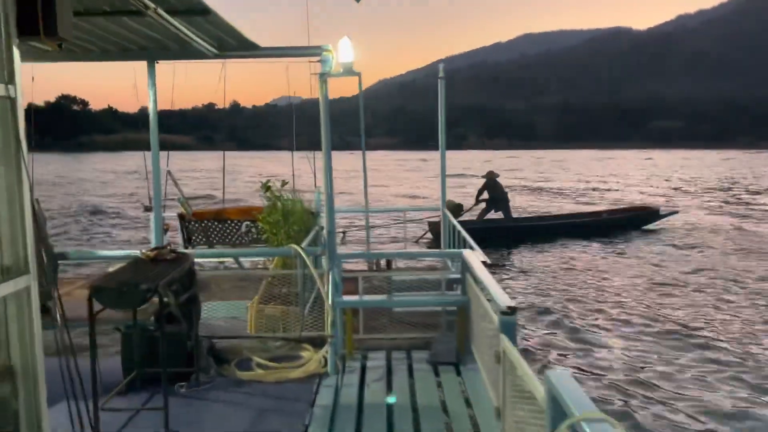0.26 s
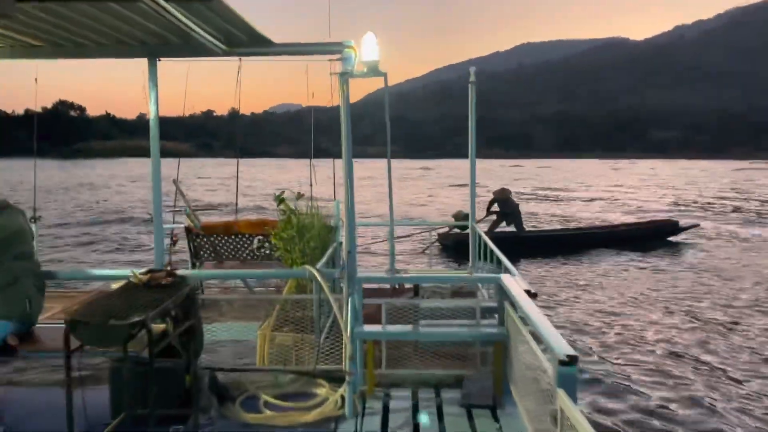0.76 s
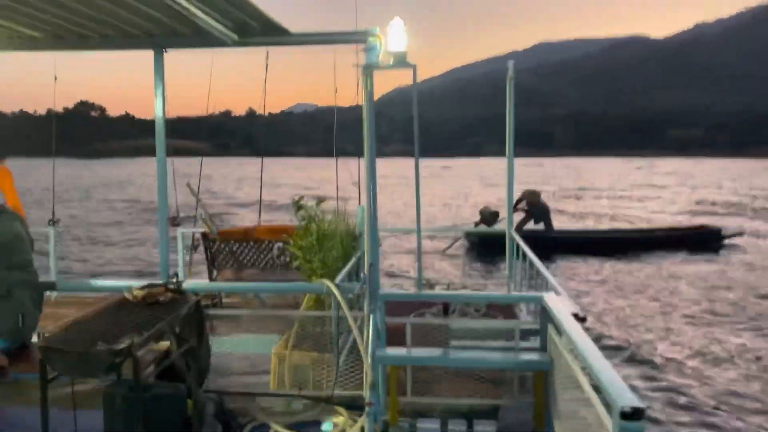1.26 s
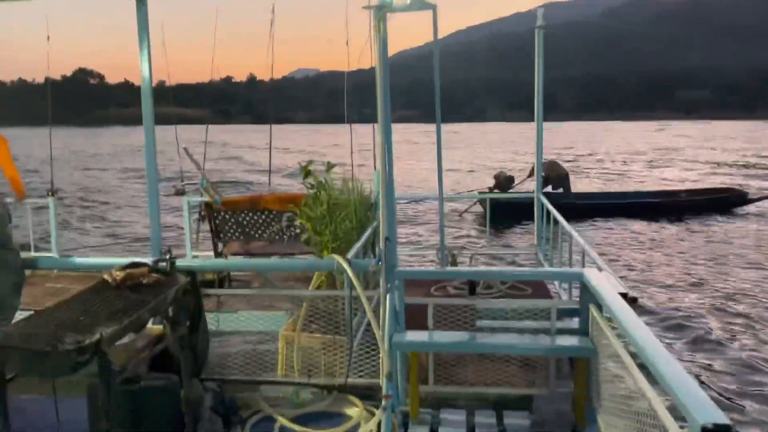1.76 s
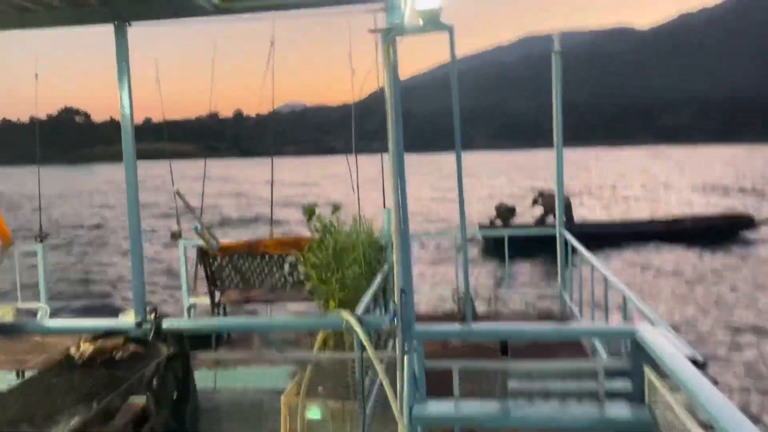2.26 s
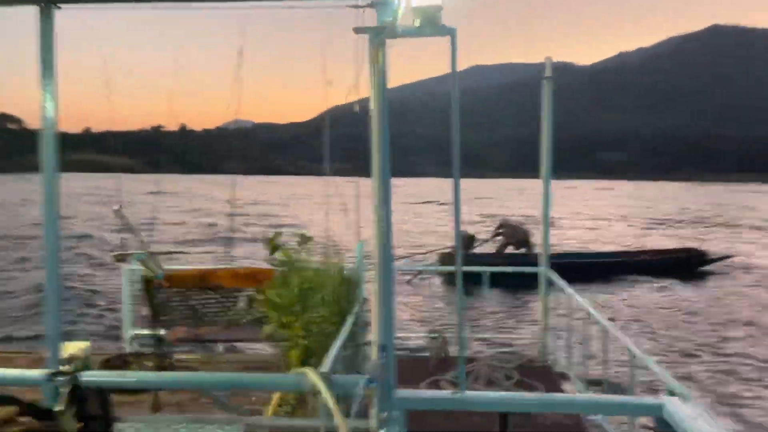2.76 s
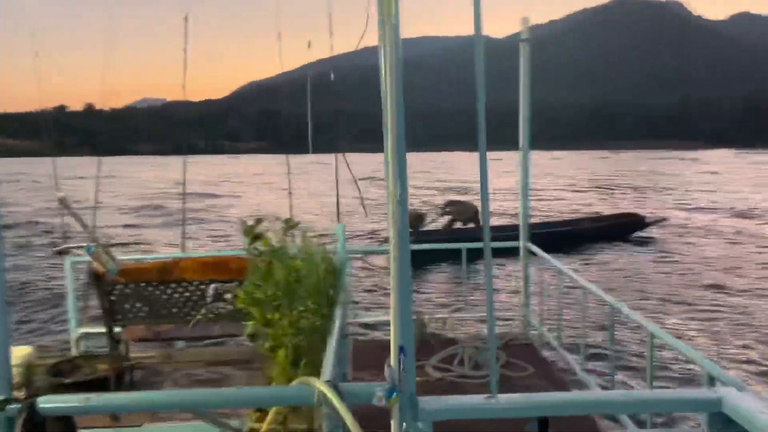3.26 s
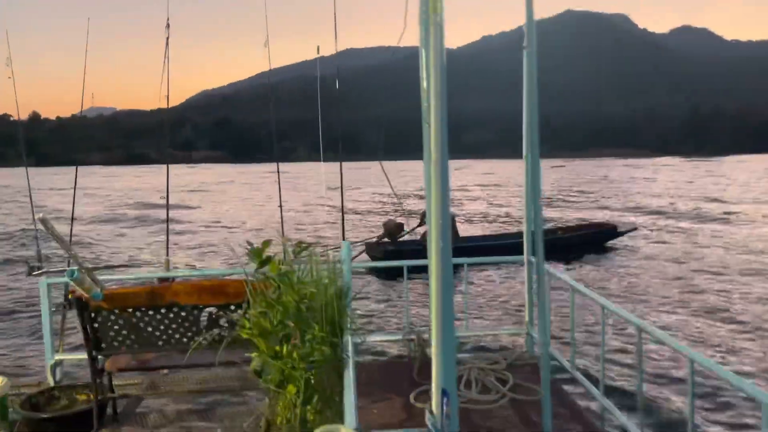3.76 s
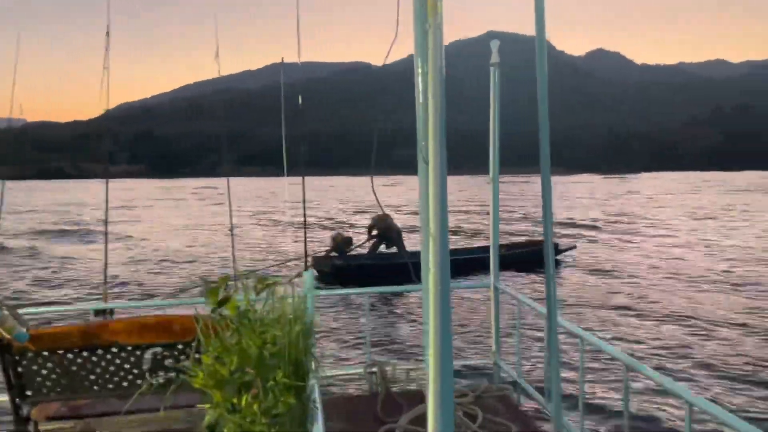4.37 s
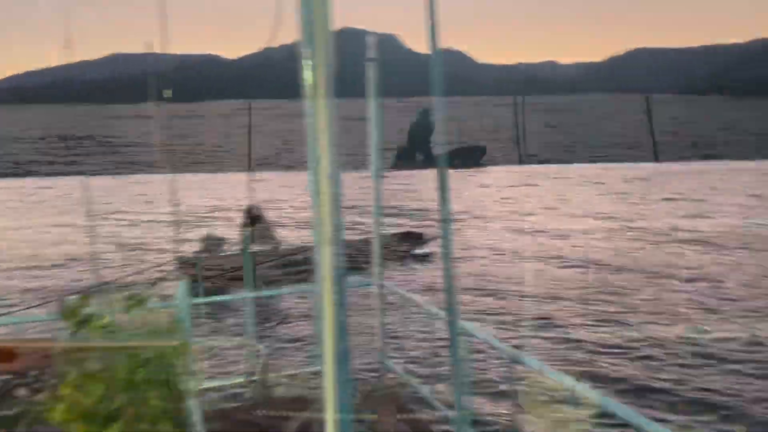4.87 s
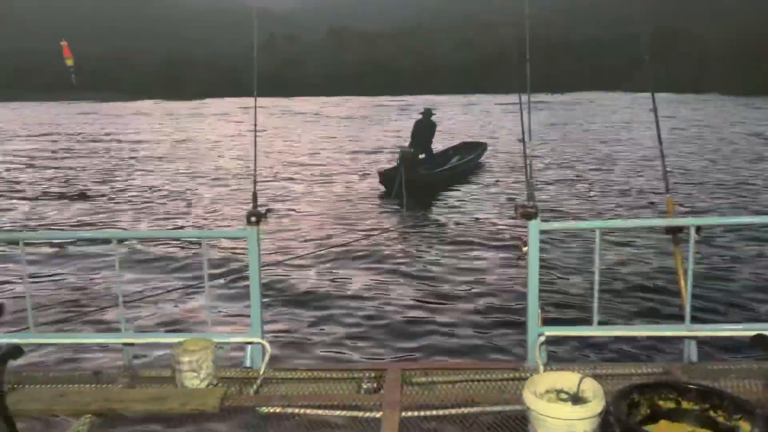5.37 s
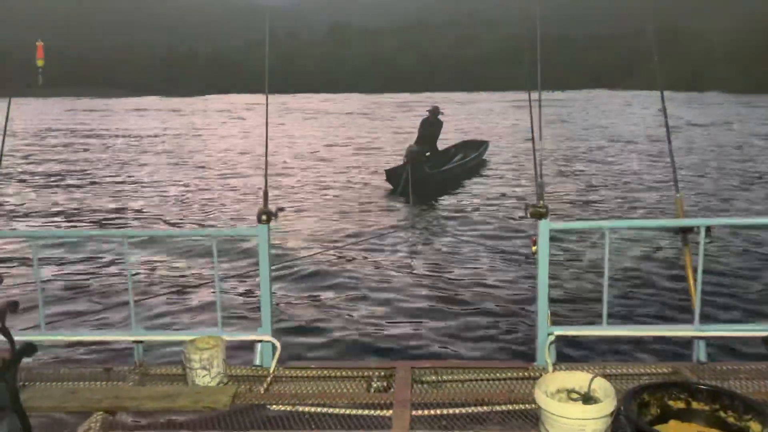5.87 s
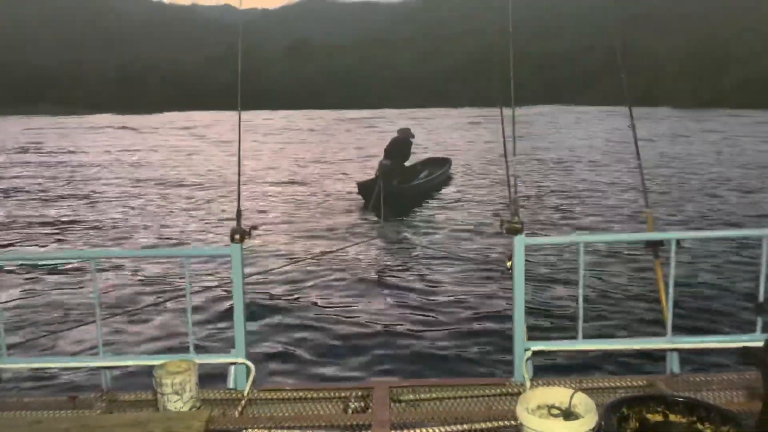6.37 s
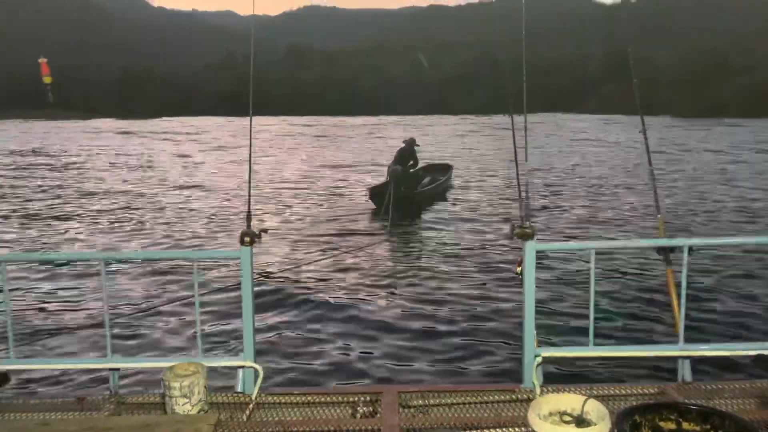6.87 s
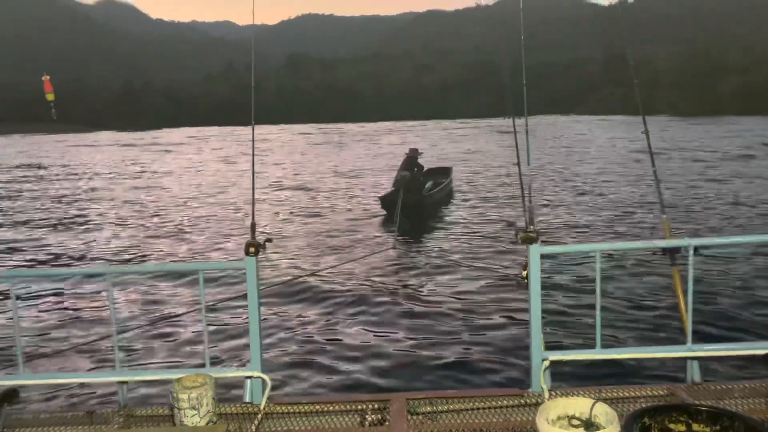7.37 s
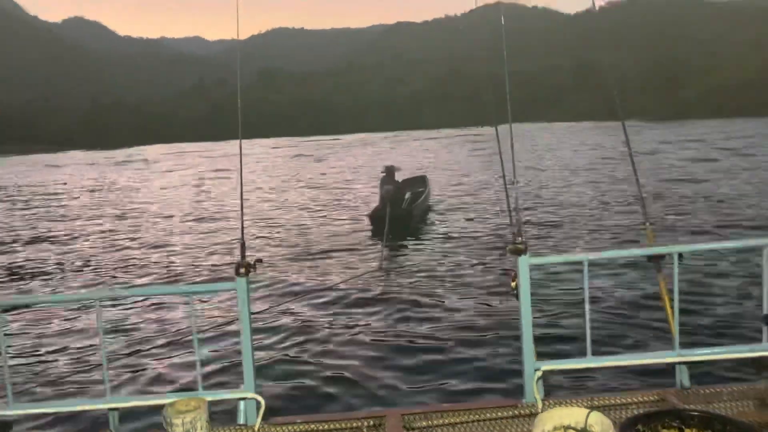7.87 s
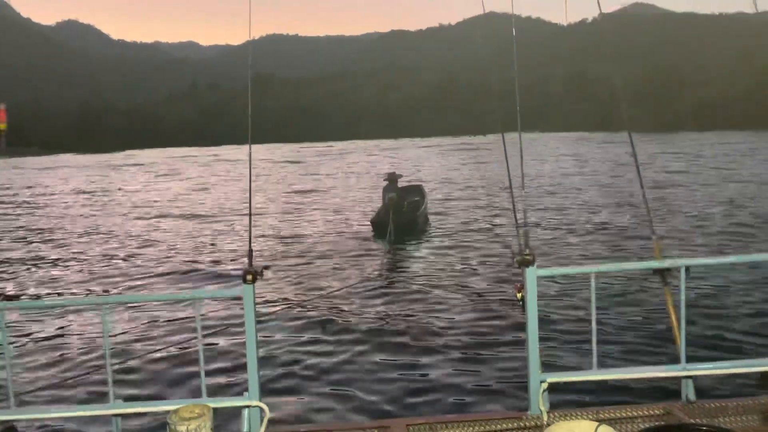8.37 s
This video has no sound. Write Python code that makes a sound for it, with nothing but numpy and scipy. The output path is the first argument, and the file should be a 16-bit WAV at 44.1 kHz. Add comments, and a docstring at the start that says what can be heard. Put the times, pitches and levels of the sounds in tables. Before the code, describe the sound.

Heard from a raft being towed across a lake, a small boat engine knocks and rattles in a quick, even rhythm over a low hum. Midway it slows and softens for a moment, then returns with a heavier thump and sharper clatter that last to the end. Water washes quietly underneath, and light gusts bump the microphone in the first half.

```python
"""The hard, rapid chug of a long-tail boat's single-cylinder engine, heard from the raft it tows on a lake.
Each firing is a rattle of valve gear, a knock and a metallic clack, then an exhaust thump a hundredth
of a second later. Midway the slowing side-on engine crossfades into a louder, faster end-on engine.
Harmonics of the firing rate hum underneath and glide with engine speed; the roofed deck adds echoes.
Water washes along the raft and wind buffets the microphone."""
import sys
import numpy as np
from scipy import signal
from scipy.fft import rfft, irfft, next_fast_len
from scipy.io import wavfile
from scipy.ndimage import map_coordinates

SR = 44100
rng = np.random.default_rng(int(sys.argv[2]) if len(sys.argv) > 2 else 0)


def generate_wav(sig):
    """Save sig (samples, or channels by samples) to the path in sys.argv[1] as 16-bit PCM at SR."""
    pcm = np.round(np.clip(np.atleast_2d(sig).T, -1, 1) * 32767).astype(np.int16)
    wavfile.write(sys.argv[1], SR, pcm)


N = 380141
TIME = np.arange(N) / SR

# engine speed, slowing almost to idle side-on, then faster end-on: t/s, firing rate/Hz
SPEED = [(0.0, 19.023), (1.3, 19.692), (2.0, 17.871), (2.3, 17.933), (3.36, 17.633), (4.27, 16.791),
         (4.45, 15.928), (4.66, 13.346), (4.89, 12.16), (4.92, 16.856), (5.64, 16.871), (5.85, 17.614),
         (7.01, 17.296), (7.6, 17.56), (7.84, 15.94), (7.95, 17.095), (8.42, 18.869), (8.62, 18.058)]
# how hard the engine works, as the strength of its clack: t/s, level/dB
EFFORT = [(0.0, -17), (0.96, -18.5), (2.36, -23), (2.72, -20), (3.55, -21), (4.32, -21.5), (4.63, -36),
          (4.82, -34), (5.01, -19), (5.25, -10.5), (5.88, -10.5), (6.14, -13), (6.72, -11.5), (7.71, -16.5),
          (8.05, -13), (8.62, -12.5)]
# exhaust strength: t/s, level/dB
EXHAUST_LEVEL = [(0.0, -1.5), (0.6, -1), (1.4, -3.5), (2.0, -2), (2.6, -3), (3.3, -2), (4.65, -3),
                 (4.95, -7.5), (5.2, 0.4), (6.0, 0.5), (6.1, -2.3), (7.85, -1.7), (8.0, -0.5), (8.6, -1.2)]
# colour of the clack with the boat side-on: f/Hz, level/dB
CLACK_SIDE = [(60, -44), (200, -24), (560, 12.5), (780, -21.5), (1300, -8.5), (2200, -1), (2800, 5.5),
              (4400, 5.5), (6000, 7.5), (7000, 5.5), (8500, -1.5)]


def exhaust():
    """The engine's thump: gas pulses ring the pipe and hull, with a passing boom end-on."""
    # pipe and hull resonances, side-on and end-on: f/Hz, width/Hz, level over the direct pulse/dB
    pipe_side = [(88.6, 25, -1), (152, 41, -13), (290, 9.7, 0), (333, 63, -15)]
    pipe_end = [(87.7, 23, 16.5), (128, 58, 3.5), (155.8, 18.7, 13.9), (223, 10, 7), (277, 21, 14.7),
                (334.6, 31, 19.3)]
    # hull boom: t/s, length/s, f/Hz, width/Hz, level over the end-on thump/dB
    booms = [(5.592, 1, 349, 30, 3)]
    side_on = exhaust_pulses(pipe_side, delay=0.00911, width=0.0016, level_db=-9.0)
    end_on = exhaust_pulses(pipe_end, delay=0.01049, width=0.0018, level_db=-15.0)
    return crossfade(side_on, end_on + passing_rings(end_on, booms))


def exhaust_pulses(pipe, delay, width, level_db, snap=0.087, snap_width=0.00023):
    """A push of gas flips steeply into a suck and sets the pipe and hull ringing."""
    def push_suck(t):
        return -t / width * bell(t, width) - snap * t / snap_width * bell(t, snap_width)
    sizes = uneven(curve(EXHAUST_LEVEL, firing_times()) + level_db, spread_db=0.53)
    puffs = each_firing(sizes, lambda t: push_suck(t - delay))
    return puffs + sum(amp(db) * resonate(puffs, hz, width_hz) for hz, width_hz, db in pipe)


def chuff(side_db=-40, end_db=-28, delay=0.0059):
    """Turbulent gas trails each exhaust pulse and fills out the thump."""
    # colour of the gas: f/Hz, level/dB
    colour = [(50, -14), (165, -2.5), (200, 1.5), (340, -15.5), (600, -48)]
    sizes = amp(curve(EXHAUST_LEVEL, firing_times()))
    puffs = each_firing(sizes, lambda t: struck(t - delay, rise=0.0054, decay=0.036))
    return crossfade(amp(side_db), amp(end_db)) * noise(colour, apart=0.05) * puffs


def clack(side_db=2.37, end_db=2.0, sizzle_db=-3):
    """Ragged bursts of metallic noise, shifting in colour, with casing rings and a bright sizzle."""
    # colour of the end-on clack and of the sizzle: f/Hz, level/dB
    end_colour = [(60, -28), (200, -19), (430, -0.5), (600, 4), (860, -8.5), (1000, 2), (1200, -10.5),
                  (1600, -5.5), (2000, -2), (2900, 1), (4500, -2), (5600, 3.5), (7000, -3), (8500, -19)]
    sizzle_colour = [(5000, -102), (7000, 7), (7800, 10.5), (9000, 8.5), (16000, -10.5)]
    # stereo placement, side-on and end-on: f/Hz, left over right/dB
    pan_side = [(100, -3), (600, 5), (1200, 19.5), (2500, 1), (6500, 2.5), (9000, -0.5)]
    pan_end = [(100, -29), (600, 1.5), (1600, -4.5), (2600, -3), (3800, 4.5), (7000, 1.5), (9000, -2)]
    # ride on the sizzle, added to the effort: t/s, level/dB
    sizzle_ride = [(0.0, 0), (1.45, 6), (2.64, 2), (4.85, -1), (4.97, -1.5), (7.2, -0.8), (7.96, 2),
                   (8.62, -3.5)]
    # casing rings that come and go: t/s, length/s, f/Hz, width/Hz, level/dB
    rings = [(1.5, 1.3, 1740, 110, 6), (2.88, 0.8, 3980, 420, 9.5), (5.64, 0.1, 978, 16, 12),
             (7.0, 1.7, 1990, 240, 2.5), (8.3, 0.9, 1330, 200, 8)]
    firings = firing_times()
    level_db = curve(EFFORT, firings)
    side_on = amp(side_db) * panned(noise(CLACK_SIDE, apart=0.17), pan_side)
    end_on = amp(end_db) * panned(noise(end_colour, apart=0.34), pan_end)
    metal = crossfade(side_on, end_on)
    bursts = clack_envelope(level_db, hold=0.0031) * grit(depth_db=2.4, seconds=0.0009)
    sizzle = drifting(noise(sizzle_colour, apart=0.015), depth_db=2.7)
    sizzle *= clack_envelope(level_db + curve(sizzle_ride, firings), hold=0.0019)
    body = drifting(metal, depth_db=3.4) * bursts
    return body + passing_rings(metal * bursts, rings) + amp(sizzle_db) * sizzle


def clack_envelope(level_db, hold, lead=0.0017, rise=0.00072, tick_lead=0.0276, tick_db=-24, run_db=-26):
    """A valve tick, then the hard burst of the firing over a soft bed of running gear."""
    def power(t):
        tick = amp(tick_db) ** 2 * bell(t + tick_lead, width=0.00088)
        burst = (.5 + .5 * np.tanh((t + lead) / rise)) * bell(t + lead, hold)
        running = amp(run_db) ** 2 * bell(t, width=0.0091)
        return tick + burst + running
    return np.sqrt(np.abs(each_firing(uneven(level_db, spread_db=1.26) ** 2, power)))


def knock(hz, level_db, width, lead=0.00055, follow=0.52):
    """Combustion gives the block one short, dull blow."""
    sizes = uneven(follow * curve(EFFORT, firing_times()) + level_db, spread_db=0.5)
    return each_firing(sizes, lambda t: bell(t + lead, width) * np.sin(2 * np.pi * hz * (t + lead)))


def casing(level_db=-17, follow=0.64, lead=0.00065):
    """The casing answers each clack a moment late and rings on briefly."""
    # colour of the after-ring: f/Hz, level/dB
    colour = [(600, -18), (1000, -6.5), (1300, -4), (2000, -1), (2400, -4.5), (3600, -36)]
    sizes = uneven(follow * curve(EFFORT, firing_times()) + level_db, spread_db=2.0)
    envelope = each_firing(sizes, lambda t: struck(t + lead, rise=0.0056, decay=0.0072))
    return noise(colour, apart=0.18) * envelope


def valve_gear(level_db=-29, follow=0.54, lead=0.009, tap_db=5, steady_db=-5):
    """The valve gear rattles all the time, and taps just before each firing."""
    # colour of the rattle: f/Hz, level/dB
    colour = [(300, -32), (750, 5), (1150, -3.5), (1450, 0.5), (2000, 3), (3000, 0), (4500, 3), (7000, -6),
              (12000, -52)]
    sizes = uneven(follow * curve(EFFORT, firing_times()) + tap_db, spread_db=3.0)
    taps = each_firing(sizes, lambda t: struck(t + lead, rise=0.0016, decay=0.0062))
    metal = amp(level_db) * noise(colour, apart=0.63)
    chatter = amp(steady_db + follow * curve(EFFORT, TIME)) * grit(depth_db=7, seconds=0.0025)
    return metal * (taps + chatter)


def casing_ring(rattle, width_hz=22):
    """Every rattle rings the casing's narrow modes."""
    # casing modes: f/Hz, level over the rattle/dB
    modes = [(990, 4.5), (1140, 4.5), (1710, -0.5), (2250, 6)]
    return sum(amp(db) * resonate(rattle, hz, width_hz) for hz, db in modes)


def spits(width=0.0017):
    """Two small metallic spits during the crossfade."""
    # spits: t/s, level/dB
    cues = [(4.876, -30), (4.944, -27)]
    return noise(CLACK_SIDE, apart=0.24) * sum(amp(db) * bell(TIME - at, width) for at, db in cues)


def firing_hum(side_db=-1, end_db=-10, waver_db=2.5, eased_hz=18.0, full_hz=19.1):
    """Harmonics of the firing rate glide with the engine's speed and fade as it nears idle."""
    # harmonics: multiple of the firing rate, level at full speed/dB, level eased off/dB
    harmonics = [(13, -52, -44), (15, -39.5, -47), (16, -57, -46), (19, -42, -48.5), (20, -49, -46),
                 (21, -46, -48.5), (23, -51, -50), (24, -49, -50), (26, -47.5, -49), (27, -45.5, -51),
                 (29, -55, -49), (30, -56, -48.5), (33, -50.5, -55)]
    phase, speed = cycles(), curve(SPEED, TIME)
    throttle = np.clip((speed - eased_hz) / (full_hz - eased_hz), 0, 1)
    tones = 0
    for multiple, full_db, eased_db in harmonics:
        level_db = eased_db + throttle * (full_db - eased_db) + waver_db * wander(0.27)
        tones += amp(level_db) * np.sin(2 * np.pi * (multiple * phase + rng.random()))
    idle_fade = np.minimum(speed / eased_hz, 1) ** 3
    return np.sqrt(2) * crossfade(amp(side_db), amp(end_db)) * idle_fade * tones


def deck_echoes(x, gap=0.0027, apart=0.11, echoes_per_s=3000, morph_s=2.625):
    """Roof, floor and rails throw back a spray of echoes, which changes as the boat moves."""
    # ring of the roofed deck: f/Hz, time to fall 60 dB/s
    ring_time = [(100, 0.36), (400, 0.21), (1500, 0.076), (9000, 0.13)]
    size, out = SR // 4, 0
    for third in np.arange(3) / 3:
        taps = rng.choice([-1., 1.], (3, size)) * (rng.random((3, size)) < echoes_per_s / SR)
        taps *= np.arange(size) > gap * SR
        hz, t, bands = signal.stft(taps[0] + apart * taps[1:], SR, nperseg=256)
        decay = amp(-60 * t / at_hz(ring_time, hz)[:, None])
        tail = signal.istft(bands * decay, SR, nperseg=256)[1]
        share = np.sqrt(2 / 3) * np.cos(np.pi * (TIME / morph_s + third))  # equal-power blend
        out += signal.fftconvolve(share * x, tail / np.linalg.norm(tail[0]), axes=1)[:, :N]
    return out


def water(wash_db=-37):
    """A low wash along the raft swells slowly and laps quickly, with splashes on top."""
    # colour of the wash and of the splashing: f/Hz, level/dB
    wash_colour = [(20, -17), (45, 0), (80, 0), (160, -6), (300, -8), (600, -14), (1500, -44)]
    splash_colour = [(450, -24), (1100, -10), (2200, -17), (4000, -22), (8000, -19), (16000, -55)]
    # ride on the splashing: t/s, level/dB
    splash_ride = [(0, -43.5), (1.5, -43.5), (2.9, -37.5), (4.7, -42.5), (5.6, -39.5), (6.5, -44),
                   (8.6, -41.5)]
    motion_db = .5 * wander(.2) + 1.1 * wander(.025)
    wash = amp(wash_db) * noise(wash_colour, apart=0.32)
    splash = amp(curve(splash_ride, TIME)) * noise(splash_colour, apart=0.75)
    return (wash + splash) * amp(motion_db)


def wind(apart=0.32, low_hz=55):
    """Each eddy hits the microphone as a short lump of low noise."""
    # buffets: t/s, level/dB, half-length/s, upper reach/Hz
    buffets = [(0.9, -30.5, 0.14, 149), (1.165, -26.5, 0.021, 130), (1.619, -28, 0.03, 330),
               (1.91, -28.5, 0.05, 340), (2.184, -28.5, 0.06, 115), (2.356, -30.5, 0.12, 188),
               (3.77, -32, 0.05, 95), (4.344, -31, 0.04, 119)]
    out = np.zeros((2, N))
    for at, db, width, reach_hz in buffets:
        air = rng.standard_normal((3, SR // 2))
        near = np.clip(round(at * SR) - SR // 4 + np.arange(SR // 2), 0, N - 1)
        eddy = filtered(air[0] + apart * air[1:],
                        lambda hz: hz ** 3 / (hz ** 3 + low_hz ** 3) / (1 + (hz / reach_hz) ** 4))
        swell = bell(TIME[near] - at, width)
        out[:, near] += amp(db) * evened(eddy * swell) * np.sqrt(np.mean(swell ** 2))
    return out


def cycles(before_first=0.805):
    """Engine cycles run so far, counted from the first firing."""
    return np.cumsum(curve(SPEED, TIME)) / SR - before_first


def firing_times():
    """The engine fires once in every cycle."""
    done = cycles()
    return np.interp(np.arange(int(done[-1]) + 1), done, TIME)


def each_firing(sizes, shape):
    """Triggers a shape (a function of seconds from the firing) at every firing."""
    train = np.zeros(N)
    train[np.clip(np.round(firing_times() * SR).astype(int), 0, N - 1)] = sizes
    return signal.fftconvolve(train, shape(np.arange(-2048, 2049) / SR), "same")


def crossfade(side_on, end_on):
    """Fades from mostly the side-on engine to mostly the end-on engine at about 5 s."""
    # crossfader: t/s, end-on share (0 to 1)
    fader = [(4.85, 0.065), (5.12, 0.72)]
    share = curve(fader, TIME)
    return (1 - share) * side_on + share * end_on


def drifting(x, depth_db, seconds=0.12, width_hz=340):
    """As the boat rocks, its paths to the ear shift: narrow bands swell and fade."""
    hz, t, bands = signal.stft(x, SR, nperseg=256)
    grid = np.meshgrid(hz / width_hz, t / seconds, indexing="ij")
    patches = map_coordinates(rng.standard_normal((64, 64)), grid, order=2, mode="mirror")
    gain = amp(depth_db * patches * np.clip((hz[:, None] - 600) / 1600, 0, 1))
    power = np.mean(np.abs(bands) ** 2, axis=(0, 2))
    gain /= np.sqrt(power @ gain ** 2 / power.sum())  # the colour shifts, the loudness stays
    return signal.istft(bands * gain, SR, nperseg=256)[1][:, :N]


def passing_rings(x, rows):
    """Resonances that swell and fade, each around its own moment."""
    return sum(amp(db) * resonate(x * bell(TIME - at, length / 2), hz, width_hz)
               for at, length, hz, width_hz, db in rows)


def grit(depth_db, seconds):
    """Loose parts strike in uneven clumps: a jagged gain of rms 1."""
    knots = np.clip(rng.standard_normal(N // 16), -2, 2)
    return evened(amp(depth_db * np.interp(TIME / seconds, np.arange(len(knots)), knots)))


def uneven(level_db, spread_db):
    """No two firings are equally strong."""
    return amp(level_db + spread_db * rng.standard_normal(len(level_db)))


def wander(seconds):
    """Glides between random values this many seconds apart."""
    knots = rng.standard_normal(2000)
    return np.interp(TIME / seconds, np.arange(len(knots)), knots)


def bell(t, width):
    """A smooth bump of height 1."""
    return np.exp(-np.minimum((t / width) ** 2, 40))


def struck(t, rise, decay):
    """A quick attack and an exponential fall."""
    since = np.maximum(t, 0)
    return (1 - np.exp(-since / rise)) * np.exp(-since / decay)


def noise(colour, apart):
    """Coloured stereo noise of rms 1; apart sets its width."""
    mid, side = rng.standard_normal((2, N))
    pair = np.array([mid + apart * side, mid - apart * side])
    return evened(filtered(pair, lambda hz: amp(at_hz(colour, hz))))


def panned(x, points):
    """Tips a pair to the left or right, band by band."""
    return filtered(x, lambda hz: amp(np.outer([.5, -.5], at_hz(points, hz))))


def resonate(x, hz, width_hz):
    """A resonance of gain 1."""
    return signal.lfilter(*signal.iirpeak(hz, hz / width_hz, fs=SR), x)


def filtered(x, response):
    """Applies a gain given as a function of frequency."""
    size = next_fast_len(x.shape[-1] + 4096)
    return irfft(rfft(x, size) * response(np.fft.rfftfreq(size, 1 / SR)), size)[..., :x.shape[-1]]


def curve(rows, t):
    """A time table's value at the times t."""
    return np.interp(t, *np.transpose(rows))


def at_hz(points, hz):
    """A spectrum table's value at hz, on a log-frequency axis."""
    f, value = np.transpose(points)
    return np.interp(np.log(hz + 1), np.log(f + 1), value)


def amp(db):
    """Decibels to gain."""
    return 10 ** (np.asarray(db) / 20)


def evened(x):
    """Scales to rms 1."""
    return x / np.sqrt(np.mean(x ** 2) + 1e-20)


def scene():
    """The engine and its echoes on the deck, over water and wind."""
    low_pan = amp([[.35], [-.35]])  # the engine's low end sits a touch left
    thump = low_pan * (exhaust() + chuff())
    blow = low_pan * crossfade(knock(hz=383, level_db=-9.0, width=0.001),
                               knock(hz=585, level_db=-13.0, width=0.0027))
    rattle = casing() + valve_gear()
    metal = clack() + spits() + rattle + casing_ring(rattle)
    echoes = deck_echoes(amp(-17.5) * thump + amp(-9.5) * metal) + deck_echoes(amp(-14) * blow, gap=0.01)
    return thump + blow + metal + low_pan * firing_hum() + echoes + water() + wind()


def record(dry, ceiling=0.88, edge_hz=16400):
    """Two resonant microphone ports, slightly out of step, then rounded peaks and a band limit."""
    # port response, resonant near 10 kHz: f/Hz, level/dB
    port_colour = [(20, -12), (45, -5.5), (70, 0), (7500, -2), (9200, 3.5), (10200, 13), (11000, 12),
                   (12000, 0), (13000, -7.5), (14000, -63), (15500, -19), (16500, -40)]
    # phase between the ports: f/Hz, left lead/rad
    port_phase = [(500, 0), (1700, -.3), (3000, .7), (6300, .4), (7800, .8), (8600, 0), (10250, -3.1),
                  (12000, -6.1), (13000, -7.2)]

    def ports(hz):
        return amp(at_hz(port_colour, hz)) * np.exp(1j * np.outer([.5, -.5], at_hz(port_phase, hz)))
    heard = filtered(dry, ports)
    rounded = heard / (1 + (heard / ceiling) ** 8) ** (1 / 8)
    low_pass = signal.firwin(511, edge_hz, window=("kaiser", 9), fs=SR)
    return signal.oaconvolve(rounded, low_pass[None], "same")


dry = scene()
out = record(dry)
generate_wav(out)
```